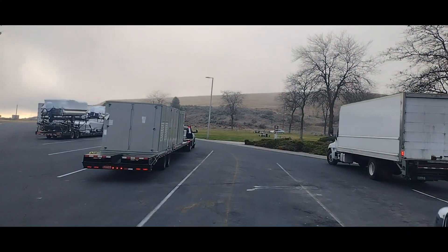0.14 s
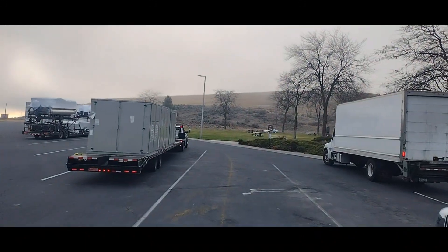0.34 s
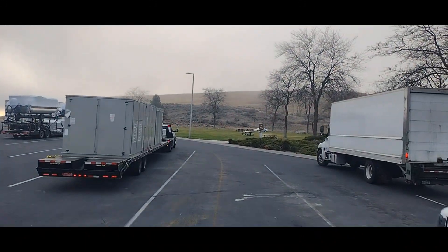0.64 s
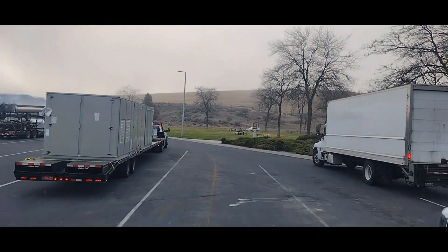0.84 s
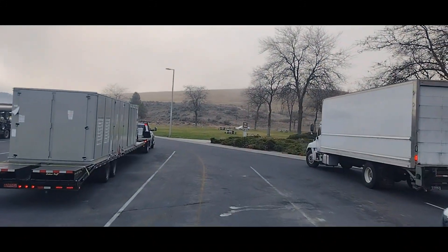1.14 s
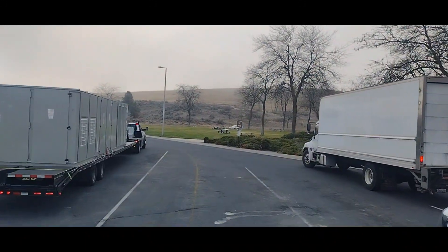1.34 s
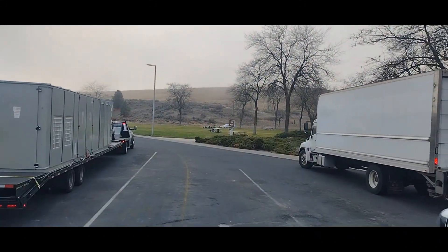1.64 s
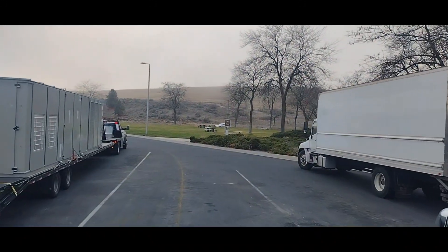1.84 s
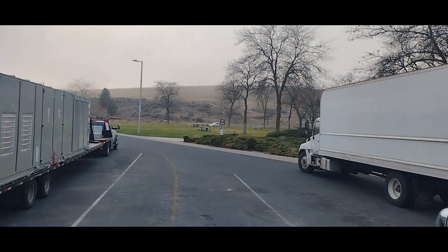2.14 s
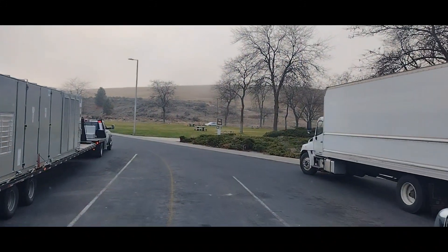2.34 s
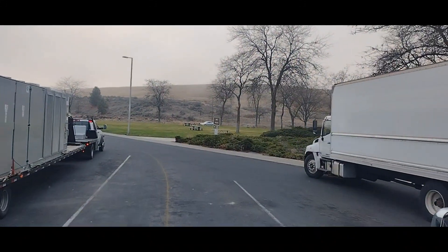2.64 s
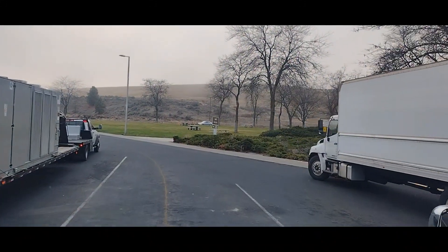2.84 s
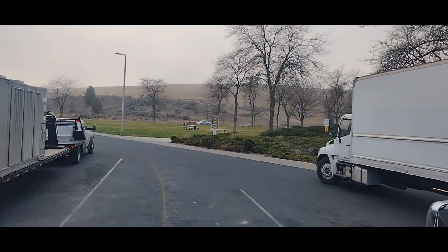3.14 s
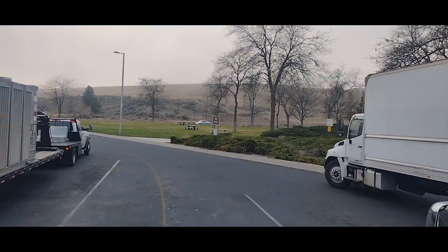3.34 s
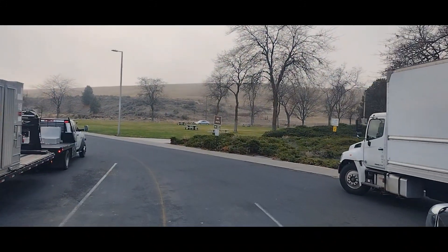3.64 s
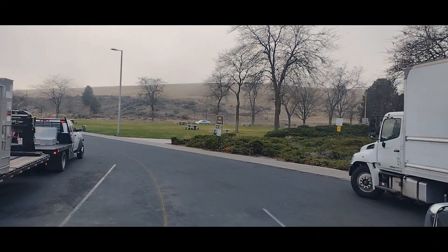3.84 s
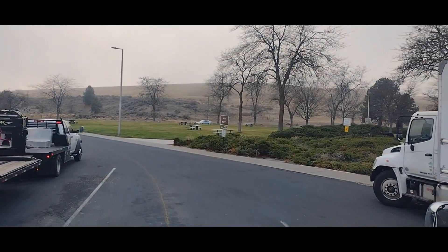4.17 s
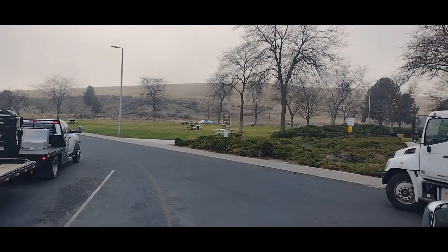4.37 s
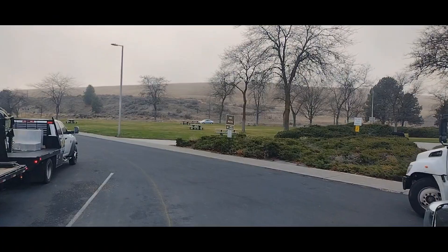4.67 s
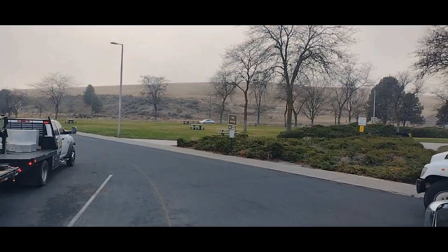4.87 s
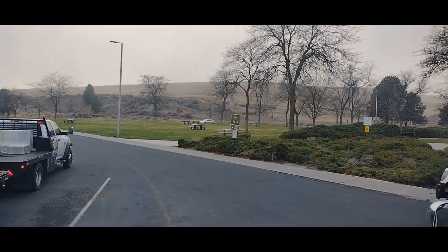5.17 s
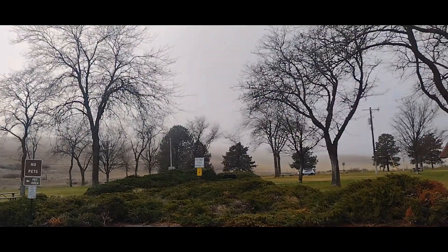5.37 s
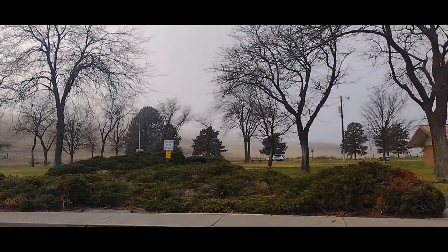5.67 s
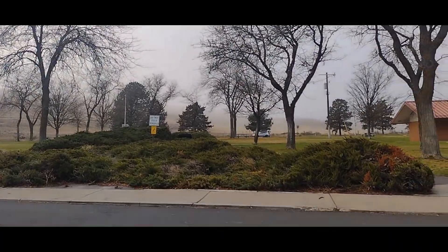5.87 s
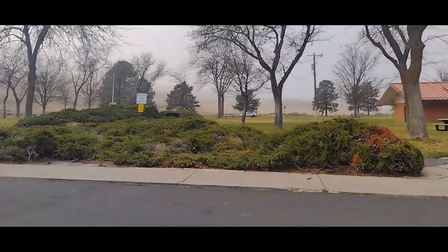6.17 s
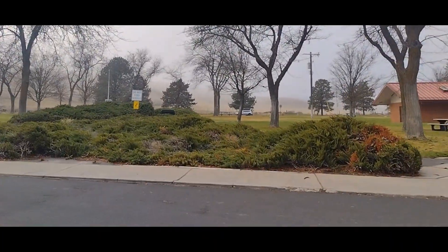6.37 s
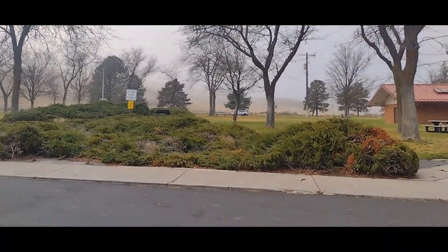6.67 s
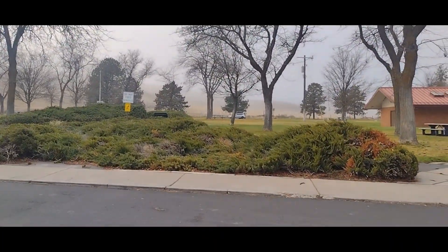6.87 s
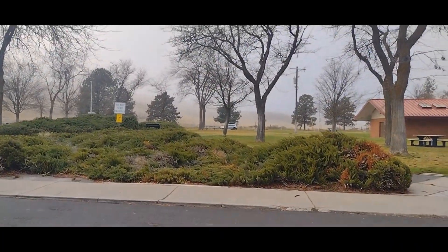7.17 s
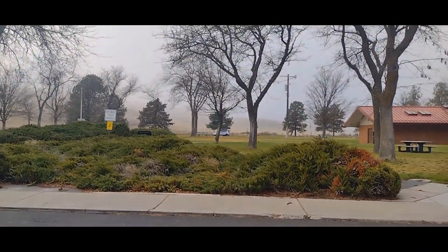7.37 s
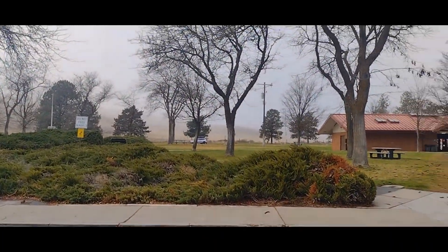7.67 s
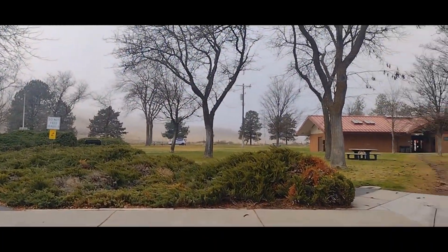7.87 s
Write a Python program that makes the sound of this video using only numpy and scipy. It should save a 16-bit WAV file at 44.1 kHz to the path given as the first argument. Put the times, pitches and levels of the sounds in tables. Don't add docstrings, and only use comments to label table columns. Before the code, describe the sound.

Low diesel rumble with buzzing cab panels sinks to a quiet idle, cuts to silence, then returns as rough rolling with jolts, buffets and faint key jingles.

```python
import sys
import numpy as np
from scipy import signal
from scipy.fft import rfft, irfft
from scipy.io import wavfile
from scipy.ndimage import uniform_filter1d

SR = 44100
rng = np.random.default_rng(int(sys.argv[2]) if len(sys.argv) > 2 else 0)


def natural_amplitude(level_db):
    exponent = np.asarray(level_db, float) / 20
    return 10 ** exponent


def transcribe(signal):
    frames = np.atleast_2d(signal).T
    limited = np.clip(frames, -1, 1)
    pcm = np.round(limited * 32767).astype(np.int16)
    wavfile.write(sys.argv[1], SR, pcm)


N = 353241
T = np.arange(N) / SR
FRAME = 4096

# time in seconds, engine cycles per second.
CRANK = [(0, 9.35), (.33, 9.55), (.99, 9.82), (1.32, 10.02), (1.98, 10.32), (2.64, 10.53), (2.97, 10.15),
         (3.3, 9.69), (3.96, 9.09), (4.29, 8.08), (4.95, 5.98), (5.27, 5.2), (5.59, 11.1), (6.5, 10.91),
         (7, 10.72), (7.5, 10.59), (8.01, 10.5)]
# time in seconds, clatter level in dB.
EFFORT = [(0, -40.5), (1.2, -39.5), (1.55, -37.5), (2.7, -37.5), (3.0, -40.5), (3.65, -45.5), (4.15, -46),
          (4.55, -52.5), (5.05, -52.5), (5.26, -55.5), (5.6, -45.5), (5.8, -38), (6.55, -38.5), (7.05, -37),
          (7.6, -38), (7.85, -41), (8.0, -42.5)]
# time in seconds, pull share 0-1, roll share 0-1, wall echo 0-1; the rest is coasting.
STATE = [
    (0, 1, 0, 0),
    (2.8, 1, 0, 0),
    (3.25, 0, 0, 0),
    (5.4, 0, 0, 0),
    (5.45, 0, 1, .6),
    (6.0, 0, 1, .6),
    (6.6, 0, 1, 0),
    (6.9, 0, 1, 0),
    (7.1, 0, 1, 1),
    (8.01, 0, 1, 1),
]
RUMBLE_DB, HISS_DB, WALL_HISS_DB = (6, 7, -3), (-24.5, -23, -29.5), 6.5
# dB above the effort when pulling, coasting, rolling.
ORDER_TONES_DB = [(-23.5, -14.5, -4.5), (-21, -17, -8), (4.5, -1.5, 3), (-3.5, -5.5, -9),
                  (-20, -0.5, -12.5), (-12.5, -6, -14.5)]
# middle in seconds, half length in seconds, dB.
TONE_SWELLS = [
    [(0, 0.18, 14), (5.5, 0.37, -10), (1.1, 0.49, 9.5), (1.66, 0.57, 11.5), (2.5, 0.93, 33.5),
     (3.0, 0.25, 5), (7, 0.16, 10), (6.5, 0.17, 5)],
    [(1.25, 0.31, 18.5), (1.95, 0.48, 10), (2.65, 0.46, 25.5), (3.05, 0.26, 9), (6.05, 0.18, -6)],
    [(1.8, 0.56, -6.5), (3.0, 0.11, 4), (3.4, 0.13, 4), (3.9, 0.66, 7.5), (5.62, 0.35, -4.5),
     (5.87, 0.038, -13), (6.4, 0.29, 3.5), (6.9, 0.48, 1.5), (7.9, 0.36, -2.5), (2.6, 0.41, -2.5)],
    [(0, .4, -1), (.8, 0.45, 3), (2.3, 0.73, 2.5), (3.0, 0.25, 9), (6.5, .25, 6.5)],
    [(.1, 0.26, 18), (2.0, 0.38, 7), (2.75, 0.57, 14.5), (6.35, .4, 0.5)],
    [(.9, 0.67, 9.5), (2.1, 0.59, 9), (6.0, 0.33, 2.5)],
]
# order in cycles, level in dB above the rumble.
UNEVEN_ORDERS = [(7, -24), (8, -30), (11, -15), (13, -16), (14, -11), (15, -19), (18, -16), (21, -21),
                 (24, -21), (26, -21), (28, -20)]
# frequency in Hz, width in Hz, boost in dB.
CAB_AIR_MODE = (151, 13, 3)
# frequency in Hz, density in dB per Hz.
PULL_COLOUR = [(15, -65), (25, -26.5), (45, -12), (60, -7), (79, -18.5), (92, -7.5), (110, -4.5), (160, -3),
               (230, -13), (500, -19.5), (950, -15), (1500, -25), (2100, -28.5), (3100, -47),
               (10300, -70.5), (11500, -79), (16000, -68)]
COAST_COLOUR = [(15, -59), (30, -24), (84, -8), (160, -6), (230, -13.5), (480, -19.5), (750, -21),
                (1000, -25), (1500, -33), (2450, -37), (2900, -40.5), (3500, -50), (6000, -56),
                (16000, -70)]
ROLL_COLOUR = [(15, -68.5), (25, -40), (48, -30.5), (65, -8.5), (100, -3.5), (166, -14.5), (330, -21),
               (540, -24.5), (1250, -26), (1950, -31.5), (2300, -32.5), (2600, -39.5), (4500, -52.5),
               (7000, -63.5), (16000, -85)]
# frequency in Hz, width in Hz, boost in dB.
COVER_MODES = [(756, 10, -6.5), (2350, 16, 0.5), (3420, 55, 6.5), (3734, 55, 7), (4220, 29, -8),
               (5810, 270, 9.5), (6400, 110, 9.5), (7050, 500, 7), (9900, 2100, 12.5)]
GLASS_MODES = [(629, 43, 3.5), (1010, 140, 4), (1570, 120, 2), (1880, 140, 2.5)]
WALL_MODES = [(2250, 970, 2), (2870, 160, 5.5), (3460, 330, -4.5), (4370, 190, 2.5)]
# frequency in Hz, width in Hz, change in dB.
TONAL_GAPS = [
    [(60, 12, -5), (112, 22, -4), (1017, 24, -7)],
    [(129, 12, -6), (476, 14, -5)],
]
# middle in seconds, half length in seconds, lift in dB.
ROUGH_ROAD = [
    (0, 0.38, 6),
    (5.74, .08, -6),
    (1.5, 0.52, -2),
    (3.4, 0.55, 3),
    (4.5, 0.31, 6),
    (4.9, 0.42, 4.5),
    (6.0, 0.26, 14),
    (6.4, 0.32, 13.5),
    (7.05, 0.39, 10),
    (7.9, 0.48, 9),
]
# middle in seconds, half length in seconds, lift in dB.
OPEN_AIR_LIFT = [
    (5.6, 0.52, 6),
]
# frequency in Hz, likeness 0-1 before rolling, likeness 0-1 when rolling.
PORT_LIKENESS = [(60, 0.8, 0.08), (128, 0.83, 0.8), (265, 0.55, 0.7), (427, 0.55, 0.8), (686, 0, 0.4),
                 (1010, 0, 0.42), (1600, 0, 0.3), (16000, 0, 0)]
# frequency in Hz, left minus right in dB.
PORT_BALANCE = [(60, 1), (110, 1.5), (200, 1.5), (380, -0.5), (700, 4), (1290, 2.5), (2380, 6.5), (4400, 8),
                (8120, 5.5), (15000, 3.5)]
# frequency in Hz, place of the swell in the cycle 0-1, level in dB.
PANEL_MODES = [(1017, .63, 0), (930, .4, -2), (846, .1, -5), (616, .8, -3), (752, .3, -4), (690, .55, -4),
               (440, .2, -2), (285, .7, 2)]
# middle in seconds, half length in seconds, lift in dB.
PANEL_SPELLS = [
    [(.1, 0.3, 5.5), (.68, 0.36, 10), (1.3, 0.81, 5.5), (1.98, 0.38, 14), (2.5, 0.29, 11), (2.9, 0.2, 11)],
    [(.6, 0.36, 13.5), (2.1, 0.26, 11)],
    [(1.15, 0.99, 14.5), (2.5, 0.48, 16.5)],
    [(.3, 0.36, 10), (2.0, 1, 12), (2.85, 0.18, 8.5)],
    [(.6, 0.35, 6), (1.2, 0.69, 10), (2.2, 0.26, 5.5)],
    [(2.7, 0.4, 11)],
    [(.2, 0.36, 6.5), (1.6, 0.96, 10.5)],
    [(1.8, 0.42, 9.5), (2.3, 0.26, 2)],
]
# start in seconds, end in seconds, start in Hz, end in Hz.
GEAR_TONES = [(3.66, 4.04, 574, 560), (3.42, 3.82, 1210, 1200), (6.0, 7.08, 488, 474),
              (7.17, 8.5, 471, 454), (7.2, 8.3, 374, 368), (3.3, 3.68, 153, 150), (3.6, 3.9, 148, 133),
              (3.15, 3.8, 102, 98), (4.3, 4.7, 198, 168), (4.65, 4.95, 150, 152), (4.85, 5.3, 150, 115),
              (3.96, 4.2, 556, 543), (4.98, 5.3, 205, 185)]
GEAR_TONES_DB = [-47, -63, -47, -47, -49, -38, -39, -39.5, -46.5, -40.5, -45.5, -53, -51]
# time in seconds, peak in dB, frequency in Hz, left minus right in dB.
WHEEL_BUMPS = [(4.185, -33.5, 162, -2), (5.609, -66, 134, 19), (5.645, -39, 129, 0), (5.826, -26.5, 127, 1),
               (6.182, -26.5, 122, 4), (5.797, -39, 120, 0), (6.216, -30, 125, 0.5), (6.319, -41, 70, 0),
               (6.551, -38, 125, 5), (6.703, -27, 112, 0), (7.389, -30, 123, 1)]
# time in seconds, peak in dB, frequency in Hz, left minus right in dB.
WIND_POPS = [(5.89, -24, 260, -27), (5.925, -12.5, 230, -29), (5.94, -18, 190, -32),
             (5.955, -18.5, 260, -32), (5.985, -14, 169, -28), (5.997, -11, 167, -32),
             (6.034, -16, 168, -31), (6.099, -22, 230, -28), (6.134, -15, 240, -25),
             (6.258, -17.5, 250, -33), (6.268, -21, 280, -30), (6.314, -20, 200, 21), (6.329, -21, 240, 24),
             (6.357, -24, 230, -29), (6.415, -21, 200, -30), (6.439, -21, 130, -31), (6.461, -12, 150, -29),
             (6.487, -17, 160, -30), (6.506, -18, 160, -31), (6.909, -21, 290, -30), (6.955, -21, 280, -32),
             (6.981, -12.5, 169, -30), (7.043, -13.5, 140, -30), (7.063, -20, 270, -30),
             (7.1, -23, 220, -30), (7.945, -19, 208, -24)]
# time in seconds, peak in dB, brightness in dB.
TRIM_KNOCKS = [(3.087, -28, -13), (3.0935, -18.5, -11), (3.1, -25, -7), (3.1055, -28, -13),
               (3.111, -30, -10), (3.118, -38, -6), (3.231, -40, -10), (4.097, -42, -1), (4.184, -35, -1),
               (4.194, -37, -2), (4.883, -39, -10), (5.0, -46, 2), (5.008, -43, -4)]
# frequency in Hz, 60 dB decay in ms, level in dB.
TRIM_MODES = [(560, 30, -8), (850, 32, -1), (1050, 30, 2), (1230, 28, 0), (1450, 25, -3), (1900, 18, -9),
              (5850, 30, -30)]
# time in seconds, peak in dB, left minus right in dB, strongest pitch in Hz.
KEY_TOUCHES = [(4.0933, -67, -1, 13900), (5.9668, -51, -1.5, 12600), (6.0213, -69, -3.5, 13900),
               (6.2566, -55, -2.5, 13900), (6.333, -57, -3.5, 10040), (6.357, -60, -4, 11900),
               (6.8004, -58.5, 6.5, 13900), (7.1684, -64.5, 12, 15000), (7.2792, -50, 13.5, 15300),
               (7.3358, -50.5, 7.5, 14800), (7.7392, -61.5, 3.5, 10040), (7.752, -65, 3.5, 10040),
               (7.9767, -61, 2, 13900), (7.992, -59.5, 0.5, 15300), (7.9967, -50.5, 2.0, 13900)]
# frequency in Hz, 60 dB decay in ms, level in dB.
KEY_RINGS = [(7700, 30, -23), (10040, 92, -0.5), (10600, 50, -8), (11900, 70, -0.5), (12600, 30, -11.5),
             (13900, 50, 6), (14600, 60, 2), (15000, 90, -4), (15300, 70, 7)]
# start in seconds, length in seconds, level in dB, tilt in dB per octave.
CLOTH_BRUSHES = [
    (6.686, 0.045, -69.5, -7.5),
    (6.83, 0.075, -67.5, -10.5),
    (6.986, 0.088, -68.5, -4),
    (7.133, 0.0028, -66.5, 2.5),
    (7.658, 0.0036, -69.5, -1),
    (7.665, 0.042, -63.5, -1),
    (7.709, 0.0028, -61, -8.5),
]


def level(x, db):
    return x * natural_amplitude(db) / np.sqrt(np.mean(x ** 2))


def on_log(hz, table, axis=1):
    rows = np.array(table, float)
    return np.interp(np.log(hz + 1), np.log(rows[:, 0] + 1), rows[:, axis])


def column(table, axis, t=T):
    rows = np.vstack(table)
    return np.interp(t, rows[:, 0], rows[:, axis])


def boosts(hz, table):
    return sum(db * np.exp(-((hz - f) / w) ** 2) for f, w, db in table)


def swells(rows, t=T):
    return sum(db * np.cos(np.pi / 2 * np.clip((t - s) / half, -1, 1)) for s, half, db in rows)


def by_state(dbs, t=T):
    pull, roll = column(STATE, 1, t), column(STATE, 2, t)
    return column(EFFORT, 1, t) + pull * dbs[0] + (1 - pull - roll) * dbs[1] + roll * dbs[2]


def wander(shape, across, along):
    w = uniform_filter1d(rng.standard_normal(shape), int(across), axis=0)
    w = uniform_filter1d(w, int(along), axis=1)
    return w / w.std()


def slow_walks(count, hold, size=256):
    steps = wander((count, N // size + 1), 1, hold)
    return uniform_filter1d(np.repeat(steps, size, axis=1)[:, :N], size)


def band(x, lo_hz, hi_hz):
    return signal.sosfilt(signal.butter(2, [lo_hz, hi_hz], "bandpass", fs=SR, output="sos"), x)


def ring(modes, chance, size=6000):
    t = T[:size]
    x = 0
    for (hz, ms, db), c in zip(modes, chance):
        tone = np.sin(2 * np.pi * hz * (1 + 0.0051 * c) * t)
        x = x + natural_amplitude(db + 3.5 * c) * tone * 1000 ** (-1000 * t / ms)
    return x / np.abs(x).max()


def sides(x, pan_db):
    return x * natural_amplitude(np.array([pan_db, -pan_db]).reshape(2, -1) / 2)


def add(out, s, x):
    i = int(s * SR)
    out[:, i:i + x.shape[1]] += x[:, :N - i]


def firing_boom(cycles):
    quick = slow_walks(count=7, hold=16)
    turn = 2 * np.pi * (cycles - .92 + .004 * quick[6])
    slow = np.repeat(wander((2 * len(UNEVEN_ORDERS), N // 256 + 1), 1, 120), 256, axis=1)[:, :N]
    out = 0
    for k, order in enumerate([6, 9, 12, 10, 16, 17]):
        strength = natural_amplitude(by_state(ORDER_TONES_DB[k]) + swells(TONE_SWELLS[k]))
        unsteady = natural_amplitude(1.0 * slow[2 * k] + 1.8 * quick[k])
        out = out + strength * unsteady * np.cos(order * turn + .3 * slow[2 * k + 1])
    pull, roll, speed = column(STATE, 1), column(STATE, 2), column(CRANK, 1)
    load_db = uniform_filter1d(by_state(RUMBLE_DB) + swells(ROUGH_ROAD), SR // 2)
    for k, (order, db) in enumerate(UNEVEN_ORDERS):
        db = db + load_db + 2 * slow[2 * k]
        db = db - 5.4 * (1 - pull) * (order % 6 > 0)
        db = db + (1 - pull - roll) * boosts(order * speed, [CAB_AIR_MODE])
        smear = .035 * (order - 12) ** 2 + 1.5 * (order % 2)
        out = out + natural_amplitude(db) * np.cos(order * turn - smear + .45 * slow[2 * k + 1])
    out = np.sqrt(2) * uniform_filter1d(out, 8)
    return np.array([out, out])


def clatter(cycles, memory, size=4096):
    memory = min(memory, .99)
    noise = rng.standard_normal((110, size))
    table = signal.lfilter([np.sqrt(1 - memory ** 2)], [1, -memory], noise, axis=0)[10:]
    return table.ravel()[(cycles * size).astype(int)]


def spectrum(x):
    return signal.stft(x, SR, nperseg=FRAME, noverlap=FRAME * 3 // 4)


def cab_clatter(cycles):
    gate = 1 + 0.03 * np.cos(2 * np.pi * 6 * cycles) + 0.018 * np.cos(2 * np.pi * 3 * cycles)
    spectra = []
    for _ in range(2):
        hz, t, low = spectrum(clatter(cycles, 0.43))
        high = spectrum(gate * clatter(cycles, 0.35))[2]
        spectra.append(np.where(hz[:, None] < 320, low, high))
    pull, roll, walls = (column(STATE, axis, t) for axis in (1, 2, 3))
    colour = np.outer(on_log(hz, PULL_COLOUR) + boosts(hz, COVER_MODES), pull)
    colour += np.outer(on_log(hz, COAST_COLOUR), 1 - pull - roll)
    colour += np.outer(on_log(hz, ROLL_COLOUR) + boosts(hz, GLASS_MODES), roll)
    colour += np.outer(boosts(hz, WALL_MODES), walls)
    rumble_db = by_state(RUMBLE_DB, t) + swells(ROUGH_ROAD, t)
    hiss_db = by_state(HISS_DB, t) + WALL_HISS_DB * walls + swells(OPEN_AIR_LIFT, t)
    wanted = [rumble_db, column(EFFORT, 1, t), hiss_db]
    lift = []
    for db, (lo, hi) in zip(wanted, [(70, 300), (300, 2500), (2700, 7000)]):
        power = natural_amplitude(2 * colour[(hz >= lo) & (hz < hi)]).sum(axis=0) * 2 / FRAME
        lift.append(db - 10 * np.log10(power))
    lift[0] -= 3.5 + 4 * pull
    gaps = np.outer(boosts(hz, TONAL_GAPS[0]), pull) + np.outer(boosts(hz, TONAL_GAPS[1]), roll)
    place = np.interp(np.log(hz + 1), np.log([180, 320, 2300, 2800]), [0, 1, 1, 2])
    share = np.maximum(1 - abs(place[:, None] - np.arange(3)), 0)
    colour += share @ np.array(lift) + gaps
    colour += 1.52 * wander(colour.shape, 8.9, 6) + 0.37 * wander(colour.shape, 220, 3.3)
    alike = np.outer(on_log(hz, PORT_LIKENESS), 1 - roll)
    alike += np.outer(on_log(hz, PORT_LIKENESS, axis=2), roll)
    alike = np.clip(alike, 0, 1)
    mid, side = spectra[0] * np.sqrt(1 + alike), spectra[1] * np.sqrt(1 - alike)
    lean = np.outer(on_log(hz, PORT_BALANCE), 1 - 0.58 * roll) / 2
    left, right = (mid + side) * natural_amplitude(colour + lean), (mid - side) * natural_amplitude(colour - lean)
    pair = np.array([left, right]) / np.sqrt(2)
    return signal.istft(pair, SR, nperseg=FRAME, noverlap=FRAME * 3 // 4)[1][:, :N] * natural_amplitude(1.0)


def panel_ringing(cycles):
    out = 0
    for k, (hz, place, db) in enumerate(PANEL_MODES):
        depth, stray = (.75, 1.5) if k == 0 else (.85, .6)
        depth, stray = (.85, .6) if k == 0 else (.75, 1.5)
        swell = np.exp(depth * np.cos(2 * np.pi * (1 + k % 2) * (cycles - place)))
        drift = stray * slow_walks(count=2, hold=16)
        tone = level(swell * np.sin(2 * np.pi * hz * T + drift), db)
        out = out + tone * natural_amplitude(-56 + swells(PANEL_SPELLS[k]))
    live = np.clip((3.01 - T) / 0.11, 0, 1)
    return sides(out * live, 4.6)


def gear_whines():
    out, walks = np.zeros((1, N)), slow_walks(count=2 * len(GEAR_TONES), hold=14)
    for k, ((t0, t1, hz0, hz1), db) in enumerate(zip(GEAR_TONES, GEAR_TONES_DB)):
        span = walks[2 * k:2 * k + 2, int(t0 * SR):int(t1 * SR)]
        waver, stray = 1.5 * span[0], .002 * span[1]
        u = T[:len(waver)] / (t1 - t0)
        fade = np.minimum(np.minimum(u, 1 - u) * (t1 - t0) / .12, 1)
        phase = 2 * np.pi * np.cumsum((hz0 + (hz1 - hz0) * u) * (1 + stray)) / SR
        add(out, t0, np.sqrt(2) * natural_amplitude(db + waver) * fade * np.sin(phase)[None])
    return out


def wheel_bumps():
    out, t = np.zeros((2, N)), T[:6000]
    for s, db, hz, pan in WHEEL_BUMPS:
        modes = [(hz, 120, 0), (1.64 * hz, 70, -10), (2.3 * hz, 50, -10)]
        thud = ring(modes, rng.standard_normal(3)) * np.minimum(t / .004, 1)
        add(out, s, sides(natural_amplitude(db + 10.0) * thud, pan))
    return out


def wind_pops():
    out = np.zeros((2, N))
    for s, db, hz, pan in WIND_POPS:
        u = (T[:2000] - .02) * hz
        push = np.exp(-(u / 0.56) ** 2) * np.sin(2 * np.pi * u + 1)
        add(out, s - .02, sides(natural_amplitude(db - abs(pan) / 2) * push, pan))
    return out


def trim_knocks():
    out, t = np.zeros((2, N)), T[:6000]
    for s, db, bright_db in TRIM_KNOCKS:
        air = rng.standard_normal((2, len(t)))
        crack = band(air, 700, 2400) + .2 * band(air, 2400, 5000)
        crack = (crack + .14 * band(air, 5300, 6300) + .06 * air) * np.exp(-t / .006)
        body = ring(TRIM_MODES, rng.standard_normal(len(TRIM_MODES))) * np.minimum(t / 0.00089, 1)
        add(out, s, sides(natural_amplitude(db) * (body + natural_amplitude(bright_db) * crack), 3.6))
    return out


def keys():
    out, t = np.zeros((2, N)), T[:6000]
    for s, db, pan, hz in KEY_TOUCHES:
        chatter = .6 + .8 * wander((2, len(t)), 1, 50)
        tick = band(rng.standard_normal((2, len(t))), 3500, 16000) * np.exp(-t / 0.004)
        modes = [(f, ms, mode_db + boosts(f, [(hz, 500, 9)])) for f, ms, mode_db in KEY_RINGS]
        tinkle = np.array([ring(modes, c) for c in rng.standard_normal((2, len(modes)))])
        add(out, s, sides(natural_amplitude(db + 5.0) * (tinkle * chatter + 0.18 * tick), pan))
    return out


def cloth():
    out, t = np.zeros((2, N)), T[:6000]
    for s, length, db, tilt_db in CLOTH_BRUSHES:
        grains = natural_amplitude(3.1 * wander((1, len(t)), 1, 42)[0])
        rub = rfft(rng.standard_normal(len(t)) * grains)
        hz = np.arange(len(rub)) * SR / len(t) + 1
        tilt = natural_amplitude(tilt_db * np.log2(hz / 6000)) / (1 + (2500 / hz) ** 4)
        rub = level(irfft(rub * tilt), db)
        stroke = np.clip(np.minimum(t / 0.0024, (length - t) / (0.69 * length)), 0, 1)
        add(out, s, sides(rub * stroke, 23.8))
    return out


def microphone_hiss():
    return level(band(rng.standard_normal((2, N)), 9500, 17000), -82.5)


def scene():
    cycles = np.cumsum(column(CRANK, 1)) / SR
    lean_db = -0.8 + column(STATE, 2) * (1.1 - 0.16 * swells(ROUGH_ROAD))
    engine = sides(firing_boom(cycles) + cab_clatter(cycles) + gear_whines(), lean_db)
    engine[1] = np.pad(engine[1], (6, 0), mode="edge")[:N]
    small = wheel_bumps() + wind_pops() + trim_knocks() + keys() + cloth()
    return engine + panel_ringing(cycles) + small


def band_limit(x):
    return signal.sosfilt(signal.butter(12, 15620, fs=SR, output="sos"), x)


def record(dry):
    fade, stop, start = 5.272, 5.285, 5.58
    falling = np.clip((stop - T) / (stop - fade), 0, 1)
    climbing = 1 - 0.47 * np.exp(-np.abs(T - start) / 0.029)
    gain = np.where(T < start, falling, climbing)
    gain = gain * np.minimum(np.minimum(T, T[-1] - T) / .002, 1)
    top = signal.ellip(8, .2, 70, 15620, fs=SR, output="sos")
    return band_limit(signal.sosfilt(top, dry + microphone_hiss()) * gain)


dry = scene()
out = record(dry)
transcribe(out)
```